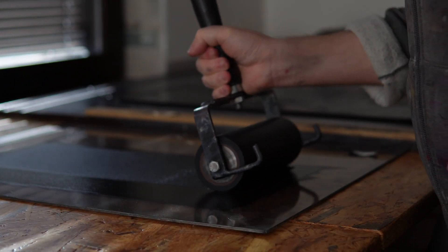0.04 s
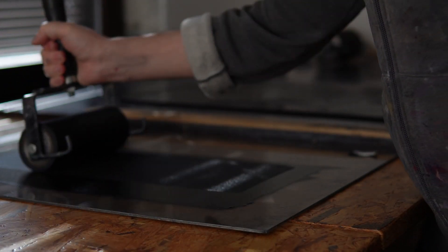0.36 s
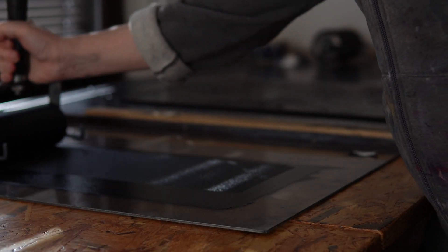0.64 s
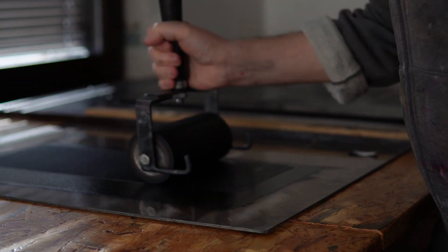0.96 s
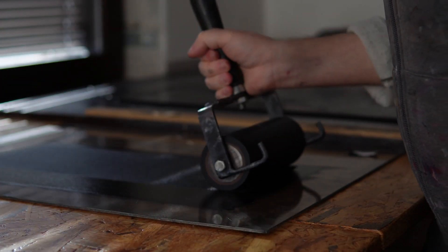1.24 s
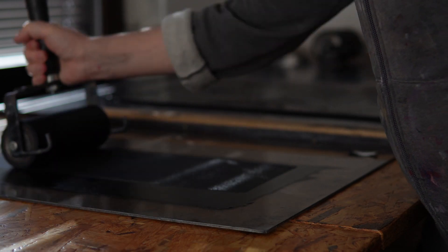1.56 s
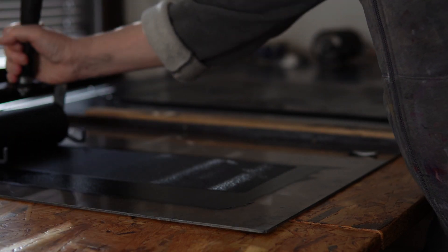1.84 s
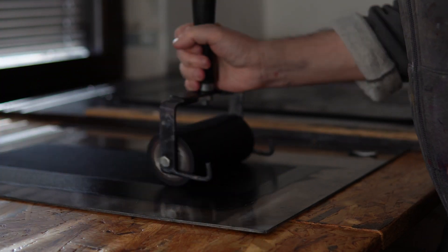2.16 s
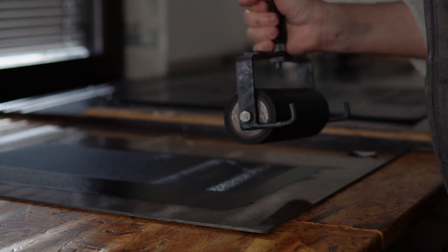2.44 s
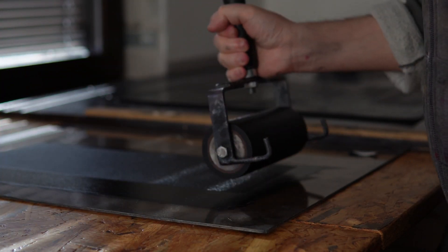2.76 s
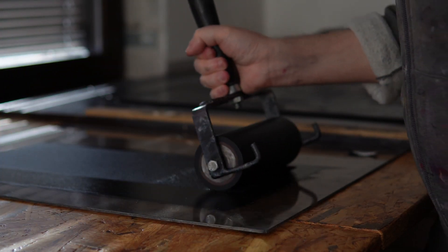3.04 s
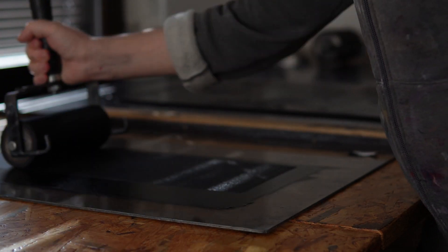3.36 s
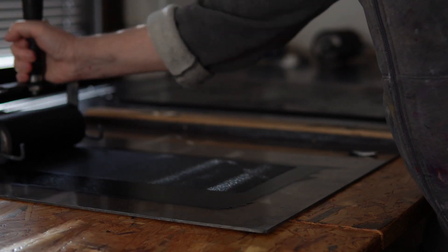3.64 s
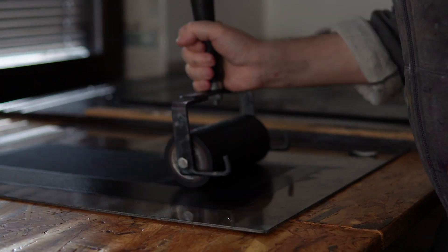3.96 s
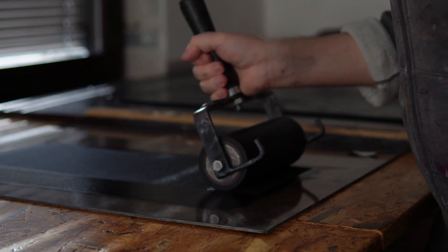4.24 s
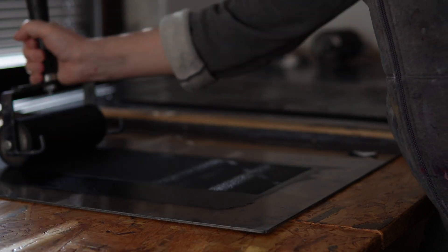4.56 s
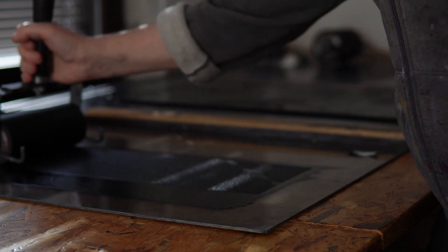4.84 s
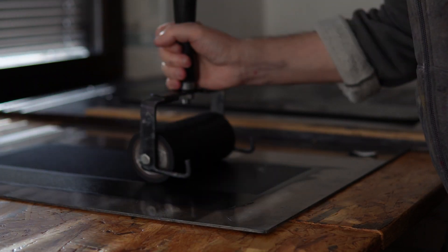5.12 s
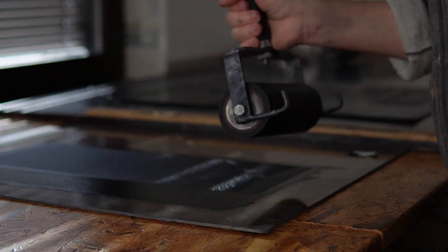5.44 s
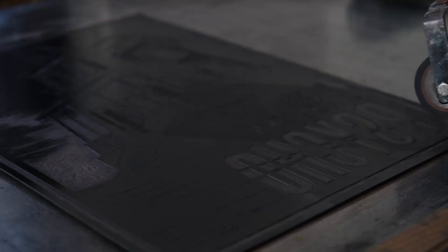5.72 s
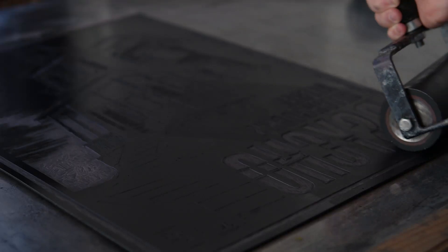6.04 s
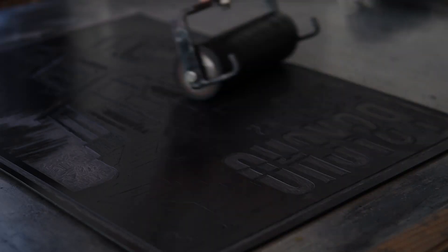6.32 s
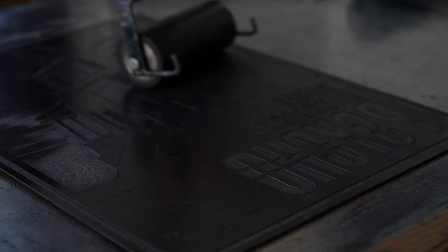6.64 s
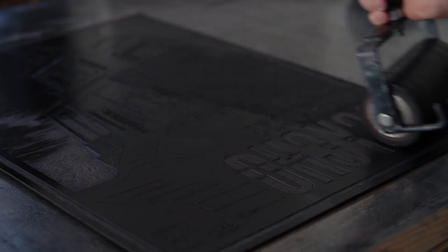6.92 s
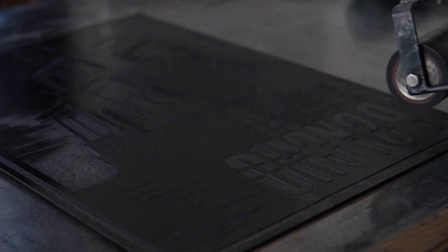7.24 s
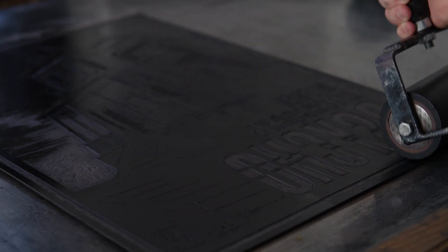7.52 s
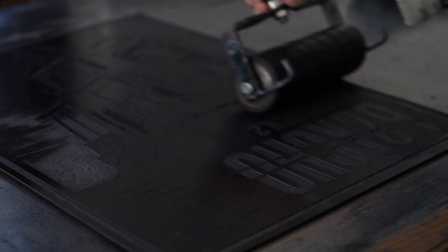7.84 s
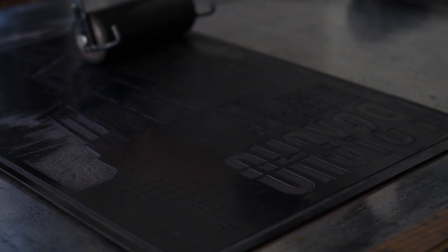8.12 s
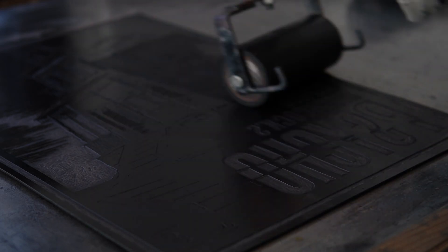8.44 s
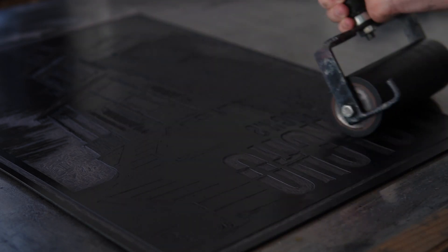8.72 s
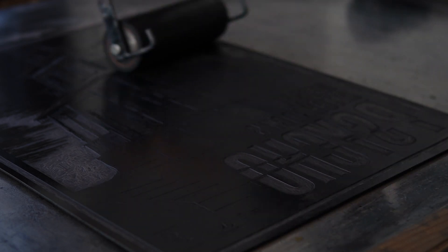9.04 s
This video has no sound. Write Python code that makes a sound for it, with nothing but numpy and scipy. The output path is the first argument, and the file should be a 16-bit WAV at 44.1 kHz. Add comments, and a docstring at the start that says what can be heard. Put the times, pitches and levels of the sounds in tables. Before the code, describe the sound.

A rubber hand roller moves back and forth through tacky ink on a slab, each stroke a dense, sticky sizzle over a low bench rumble. Its dry axle squeaks on the push and whistles on the pull, and the metal frame clanks when it lands. It then rolls over a printing block, with fainter sizzle and heavier rumble. The sound is close and in stereo, in a small, quiet workshop.

```python
"""A small quiet workshop, a stereo pair close to the bench. A rubber hand roller is worked through
tacky ink on a slab, lifted, set down, then rolled over a relief block. Ink threads snap in a dense
sizzle while the rubber crackles and rumbles on the bench. The dry axle sticks and slips, squeaking on
the push and whistling on the pull, and the steel frame clanks at each landing.
Short echoes and faint room tone lie behind."""
import sys
import numpy as np
from scipy import signal
from scipy.fft import next_fast_len
from scipy.io import wavfile

SR = 44100
rng = np.random.default_rng(int(sys.argv[2]) if len(sys.argv) > 2 else 0)


def wav_record(signal):
    """Record a signal, one row per channel, as 16-bit PCM in the file named by sys.argv[1]."""
    frames = np.transpose(np.atleast_2d(signal))
    bounded = np.clip(frames, -1, 1)
    # unit amplitude maps onto the largest positive 16-bit level
    quanta = np.round(bounded * 32767).astype(np.int16)
    wavfile.write(sys.argv[1], SR, quanta)


N = 404838
T = np.arange(N) / SR

# spectrum of ink threads snapping, on the slab and singly: f/Hz, level/dB
INK_SPECTRUM = [(500, -29), (1200, -16), (2200, -11), (3500, -7.5), (5000, -3.5), (7000, 1), (9000, 2),
                (13000, 3.5), (16000, -1.5)]


def amp(db):
    """Decibels to gain."""
    return 10 ** (np.asarray(db) / 20)


def unit(x):
    """Scale to rms 1."""
    return x / np.sqrt(np.mean(x ** 2))


def colour(x, points):
    """Filter a sound by a curve of (f/Hz, level/dB) points, to rms 1."""
    hz, db = np.transpose(points)
    f = np.maximum(np.fft.rfftfreq(x.shape[-1], 1 / SR), 1)
    gain = amp(np.interp(np.log(f), np.log(hz), db))
    return unit(np.fft.irfft(np.fft.rfft(x) * gain, x.shape[-1]))


def walk(t, rate):
    """Random wander with spread near 1 and `rate` turns a second."""
    knots = rng.standard_normal(4096)
    return 1.2 * np.interp((t * rate) % 4095, np.arange(4096), knots)


def add(out, start, x):
    """Mix a sound in at its time."""
    i = max(int(start * SR), 0)
    out[i:i + len(x)] += x[:max(N - i, 0)]


def spread(make, side_db):
    """A wide source: the same process feeds the middle and, more weakly, the sides."""
    return make() + amp(side_db) * make() * np.array([[1], [-1]])


def resonate(x, hz, width_hz, db):
    """What one resonance adds to a sound."""
    return amp(db) * signal.lfilter(*signal.iirpeak(hz, hz / width_hz, SR), x)


def bench(x):
    """The wooden top booms at its lowest modes."""
    # modes of the bench top: f/Hz, width/Hz, level/dB
    bench_modes = [(126.4, 11, 8.5), (176.5, 17, 7.5), (223, 9.1, -2), (306, 2.8, 6.5), (449.4, 10, 3)]
    return unit(x + sum(resonate(x, *mode) for mode in bench_modes))


def knocks(thud_rise_s=0.0042, thud_decay_s=0.037, clank_rise_s=0.00033):
    """Each contact is a brief chatter of loose parts that rings the steel frame, and a bench thud."""
    # landings, lift-offs and bumps over the relief: t/s, clank/dB, clank decay/s, thud/dB, thud f/Hz
    contacts = [(.002, -39, 0.041, -30.5, 177), (2.28, -34.5, 0.074, -45, 300),
                (2.501, -46.5, 0.02, -58, 287.5), (2.957, -28.5, 0.011, -25.5, 185),
                (2.971, -26.5, .017, -22.5, 185), (5.31, -40.5, .06, -35.5, 250),
                (5.596, -43, 0.033, -51, 305), (5.745, -46.5, 0.07, -66.5, 300),
                (6.009, -49, 0.01, -26.5, 90), (6.024, -25.5, 0.0099, -25, 198),
                (6.514, -50, .01, -36, 205), (6.939, -40, 0.011, -31, 138), (7.03, -31.5, 0.016, -52, 201),
                (7.111, -30, .016, -60, 200), (7.143, -41, 0.051, -53, 200), (7.609, -27, 0.0092, -34, 76),
                (7.86, -52, .01, -35, 175)]
    # spectrum of the loose parts: f/Hz, level/dB
    clank_spectrum = [(150, -2), (500, -1.5), (1300, 7), (2500, 2.5), (5000, 1), (8000, 1), (12000, -12.5),
                      (16000, -9)]
    # modes of the steel frame: f/Hz, width/Hz, level/dB
    frame_modes = [(1620, 8.6, 3.5), (2418, 49, 7), (2894, 150, 5.5), (3140, 40, -7), (3735, 17, 13),
                   (5070, 30, 8.5), (6450, 48, 8), (8540, 34, 11.5), (9450, 40, 11), (11440, 30, 18.5)]
    clatter, thuds, t = np.zeros(N), np.zeros(N), T[:SR // 2]
    for start, clank_db, decay, thud_db, thud_hz in contacts:
        contact = np.exp(-t / decay) * (1 - np.exp(-t / clank_rise_s)) * amp(2.6 * walk(t, 300))
        clank = colour(rng.standard_normal(len(t)), clank_spectrum)
        add(clatter, start, amp(clank_db) * contact * clank)
        band = signal.butter(3, [thud_hz / 2, thud_hz * 1.82], "band", fs=SR, output="sos")
        boom = bench(signal.sosfilt(band, rng.standard_normal(len(t))))
        envelope = np.exp(-t / thud_decay_s) * (1 - np.exp(-t / thud_rise_s))
        add(thuds, start, amp(thud_db) * boom * envelope)
    return clatter + sum(resonate(clatter, *mode) for mode in frame_modes) + thuds


def snaps(rate, spread_db):
    """Tiny ruptures of unequal size, `rate` a second."""
    chance, size = rng.random(N), rng.standard_normal(N)
    share = np.clip(rate / SR, 1e-4, 1)
    return (chance < share) * rng.choice([-1, 1], N) * amp(spread_db * size) / np.sqrt(share)


def ink(strokes, spectrum, spread_db, patchy_db, side_db, thin_hz):
    """Ink threads snap behind the roller in patches of tack; near each turn, few, faint and thin."""
    speed, gain = np.zeros(N), np.zeros(N)
    for start, _, end, _, _, db, rise, fall in strokes:
        build_up = 1 - np.exp(-np.maximum(T - start, 0) / rise)
        stroke = build_up * np.tanh(np.maximum(end - T, 0) / fall / 2) ** 1.22
        speed += stroke
        gain += amp(db) * stroke
    snaps_per_s = 14000 * (.2 + speed)
    sizzle = spread(lambda: colour(snaps(snaps_per_s, spread_db), spectrum), side_db)
    body = signal.sosfilt(signal.butter(1, thin_hz, fs=SR, output="sos"), sizzle)
    return (sizzle - body * np.clip(1 - speed, 0, 1)) * gain * amp(patchy_db * walk(T, 60))


def rolling(strokes, rumble_power, crackle_power, rumble_turn_db, crackle_turn_db, settle_s, bumps_db):
    """The turning rubber shakes the bench and crackles over the surface, both growing with speed."""
    # spectrum of the bench rumble: f/Hz, level/dB
    rumble_spectrum = [(30, -36.5), (60, -14), (95, -5.5), (120, -3.5), (150, -5.5), (185, -4.5),
                       (300, 0.5), (450, -3.5), (700, -26.5), (1500, -44.5)]
    # spectrum of the crackling rubber: f/Hz, level/dB
    rubber_spectrum = [(200, -34.5), (450, -4.5), (650, -1.5), (1100, -5), (1700, -5), (2800, -9.5),
                       (6000, -20.5)]
    # hollow resonances under the rubber: f/Hz, width/Hz, level/dB
    hollow_modes = [(526, 21, 0.5), (740, 16, -10.5), (1018, 11, -11)]
    shake, press = np.zeros(N), np.zeros(N)
    for start, fastest, end, rumble_db, crackle_db, *_ in strokes:
        speed = np.sin(np.pi / 2 * np.interp(T, [start, fastest, end], [0, 1, 0]))
        # a little sound carries through the turns and settles after the last
        contact = np.exp(-np.maximum(T - end, 0) / settle_s) * np.clip((T - start) / settle_s + 1, 0, 1)
        rumble_drive = np.hypot(speed ** rumble_power, amp(rumble_turn_db) * contact)
        crackle_drive = np.hypot(speed ** crackle_power, amp(crackle_turn_db) * contact)
        shake = np.maximum(shake, amp(rumble_db) * rumble_drive)
        press = np.maximum(press, amp(crackle_db) * crackle_drive)
    rumble = spread(lambda: bench(colour(snaps(1500, 2.1), rumble_spectrum)), side_db=-17.5)
    crackle = spread(lambda: colour(snaps(1800, 2.1), rubber_spectrum), side_db=-18)
    crackle = unit(crackle + sum(resonate(crackle, *mode) for mode in hollow_modes))
    return amp(bumps_db * walk(T, 40)) * (rumble * shake + crackle * press)


def roller_on_slab():
    """Back and forth through tacky ink: a dense, even sizzle over a low rumble."""
    # strokes: start t/s, fastest t/s, end t/s, rumble/dB, crackle/dB, sizzle/dB, its rise/s, its fall/s
    strokes = [ (.04, .38, 0.69, -45, -46, -26, 0.082, 0.044),
               (.69, 1.03, 1.286, -45, -45.5, -27.5, 0.021, 0.038),
               (1.265, 1.53, 1.872, -45, -45.5, -26, 0.042, 0.046),
               (1.86, 2.23, 2.368, -43.5, -45, -27, 0.037, 0.017),
               (3.035, 3.3, 3.646, -45, -44, -26.5, 0.051, 0.032),
               (3.632, 3.93, 4.247, -44.5, -45.5, -27, 0.032, 0.044),
               (4.23, 4.56, 4.822, -44, -44.5, -25, 0.043, 0.042),
               (4.83, 5.28, 5.392, -44, -44.5, -27, 0.038, 0.026)]
    sizzle = ink(strokes, INK_SPECTRUM, spread_db=2.5, patchy_db=0.76, side_db=-7.5, thin_hz=5070)
    return sizzle + rolling(strokes, rumble_power=1, crackle_power=1.24, rumble_turn_db=-10,
                            crackle_turn_db=-15.5, settle_s=0.032, bumps_db=1.3)


def axle(rows, partials, swell_db, flutter_db, mellow_db, jitter, chatter_hz, chatter_depth,
         flicker_db, scrape_db, edge_s):
    """Stick-slip tones glide and mellow as the axle frees itself; chatter adds sidebands and grit."""
    # spectrum of the axle scraping in its hole: f/Hz, level/dB
    scrape_spectrum = [(700, -31.5), (1250, -2.5), (1800, 3.5), (2600, 2.5), (3800, 5.5), (5000, -3),
                       (8000, -10), (13000, 6), (16000, 5)]
    out, grit = np.zeros(N), colour(rng.standard_normal(N), scrape_spectrum)
    for start, loudest, end, pitch_hz, glide, db, overtone_db, chatter in rows:
        t = np.arange(int(max(end - start, .01) * SR)) / SR
        along = np.linspace(-.5, .5, len(t))
        bounce = np.sin(2 * np.pi * np.cumsum(chatter_hz * (1 + 0.19 * walk(t, 150))) / SR)
        hz = pitch_hz * (1 + glide * along) * (1 + jitter * (0.39 + chatter) * walk(t, 400))
        phase = 2 * np.pi * np.cumsum(hz) / SR + chatter_depth * chatter * bounce
        bright_db = overtone_db - mellow_db * along
        tone = sum(amp(partial_db + bright_db * (k > 1) + flicker_db * walk(t, 132)) * np.sin(k * phase)
                   for k, partial_db in partials)
        scrape = amp(scrape_db) * chatter * grit[int(start * SR):][:len(t)]
        grip = np.sin(np.pi / 2 * np.clip(np.minimum(t, t[-1] - t) / edge_s, 0, 1))
        off_peak = np.interp(start + t, [start, loudest, end], [1, 0, 1])
        swell = amp(db - swell_db * off_peak + flutter_db * walk(t, 70))
        tremor = 1 + 0.58 * chatter * bounce
        add(out, start, swell * grip * (np.sqrt(2) * tone + scrape) * tremor)
    return out


def squeaks():
    """Pushing makes the axle squeak through resonances of the fork."""
    # squeaks: start t/s, loudest t/s, end t/s, f/Hz, glide/share of f, level/dB, overtones/dB, chatter
    slips = [ (.125, .225, 0.29, 1945, 0.035, -26.5, -11, 0.09),
             (.19, .205, .23, 1242, 0.014, -37.5, -4, 0.9),
             (1.205, 1.235, 1.287, 1927, 0.034, -33.5, -3, 0.46),
             (1.35, 1.385, 1.458, 1922, 0.036, -27.5, -5, 0.44),
             (1.365, 1.385, 1.42, 1263, .01, -37, -8, 0.9),
             (3.092, 3.18, 3.33, 1886, 0.036, -30.5, -2, 0.62),
             (3.905, 3.925, 4.05, 1197, 0.012, -41, 2, 0.92),
             (4.265, 4.335, 4.426, 1878, .01, -24.5, -6, .33),
             (6.169, 6.187, 6.252, 1940, 0.01, -25.5, -10, 0.6),
             (7.752, 7.762, 7.778, 1926, 0.0054, -25.5, 1, .4),
             (7.782, 7.827, 7.842, 1950, .075, -25.5, -11.5, 0.28),
             (8.179, 8.194, 8.213, 1630, 0.06, -18, -9.5, 0),
             (8.664, 8.697, 8.726, 1802, -0.022, -22.5, -5.5, 0.51),
             (8.778, 8.825, 8.87, 1941, 0.019, -23, -8.5, 0.46)]
    # harmonics of a squeak: multiple, level/dB
    partials = [(1, -3), (2, -3.5), (3, -1), (4, 1.5), (5, -4), (6, -6), (7, -4), (8, -16.5)]
    fork_modes = [(7350, 50, 10), (9340, 20, 22), (1550, 69, -2.5)]  # f/Hz, width/Hz, level/dB
    push = axle(slips, partials, swell_db=6, flutter_db=2, mellow_db=5, jitter=0.017,
                chatter_hz=247.7, chatter_depth=0.14, flicker_db=4, scrape_db=2.5, edge_s=0.01)
    return push + sum(resonate(push, *mode) for mode in fork_modes)


def squeals(mode_hz=11370, waver=0.0048, gap_s=0.02):
    """The bearing catches for an instant, slips, catches again, and rings one very high mode."""
    # double catches: t/s, half length/s, level/dB, second catch relative to the first/dB
    catches = [(0.393, 0.0072, -12.5, 1.5), (0.483, 0.013, -18.5, -15), (1.571, 0.0044, -15, -11),
               (2.87, 0.014, -25, -4), (2.934, 0.023, -20.5, -19), (3.424, 0.011, -20, -17),
               (4.561, 0.0078, -17, 3), (6.429, 0.0063, -22, 11), (8.111, .013, -20.5, -22),
               (8.435, .005, -28.5, -18), (8.504, 0.0066, -20.5, -7), (9.075, 0.0077, -9.5, -11)]
    out = np.zeros(N)
    for centre, half, db, second_db in catches:
        t = np.arange(-3 * half, gap_s + 3 * half, 1 / SR)
        envelope = np.exp(-(t / half) ** 2) + amp(second_db) * np.exp(-((t - gap_s) / half) ** 2)
        phase = 2 * np.pi * np.cumsum(mode_hz * (1 + waver * walk(t - t[0], 300))) / SR
        add(out, centre + t[0], amp(db) * envelope * np.sqrt(2) * np.sin(phase))
    return out


def whistles():
    """Pulling makes the axle whistle, higher and purer than it squeaks."""
    # whistles: start t/s, loudest t/s, end t/s, f/Hz, glide/share of f, level/dB, overtones/dB, chatter
    slips = [ (.58, .6, 0.64, 3520, 0.01, -41, -8, .7), (.87, .955, 1.022, 3550, 0.016, -30, -4, 0.33),
             (1.735, 1.77, 1.86, 3540, 0.0084, -32.5, -14, 0),
             (2.124, 2.15, 2.222, 3540, .012, -26, -2, 0.28),
             (2.322, 2.36, 2.412, 2980, .045, -34, -14, .5),
             (2.338, 2.35, 2.363, 5075, .012, -36, -17, .25),
             (3.505, 3.53, 3.56, 3540, 0.036, -36, -15, 0.4),
             (3.795, 3.87, 3.97, 3535, 0.018, -23.5, -4.5, 0.28),
             (3.912, 3.93, 4.07, 5070, -0.023, -34.5, -19, 0.15),
             (4.69, 4.72, 4.75, 3560, 0.047, -42, -12, 0.5),
             (5.013, 5.16, 5.245, 3525, -0.0042, -27, -5.5, 0.39),
             (5.148, 5.17, 5.19, 3510, 0.016, -24, -3, 0),
             (5.32, 5.33, 5.352, 2900, -0.0073, -29.5, -17, 0.5),
             (5.365, 5.41, 5.48, 3040, -.006, -41, -15, 0.34),
             (6.503, 6.512, 6.55, 3460, -.008, -33, 8.5, 0.26),
             (6.63, 6.642, 6.688, 3458, .016, -26.5, -2.5, .35)]
    # harmonics of a whistle: multiple, level/dB
    partials = [(1, 0), (2, -1), (3, -46.5)]
    return axle(slips, partials, swell_db=8, flutter_db=1.5, mellow_db=4.5, jitter=0.014,
                chatter_hz=284, chatter_depth=0.65, flicker_db=2.5, scrape_db=-17.5, edge_s=0.009)


def roller_on_block():
    """Over the relief the ink snaps more faintly and unevenly, and the rubber rumbles harder."""
    # strokes: start t/s, fastest t/s, end t/s, rumble/dB, crackle/dB, sizzle/dB, its rise/s, its fall/s
    strokes = [ (6.08, 6.51, 6.79, -40, -37, -39, 0.088, 0.078),
               (6.6, 6.76, 7.085, -39, -38.5, -39, 0.084, .036),
               (7.63, 8.02, 8.29, -40.5, -38.5, -35.5, 0.15, 0.093),
               (8.24, 8.45, 8.8, -39.5, -40, -39.5, 0.039, 0.077),
               (8.7, 9.06, 9.41, -42, -37.5, -35.5, 0.061, 0.18)]
    # spectrum of ink snapping on the block: f/Hz, level/dB
    spectrum = [(500, -30.5), (1200, -25), (2200, -11.5), (4000, -1), (7000, 5), (10000, 3), (13000, 4),
                (16000, -1)]
    sizzle = ink(strokes, spectrum, spread_db=5.5, patchy_db=1.6, side_db=-6, thin_hz=2000)
    return sizzle + rolling(strokes, rumble_power=2.4, crackle_power=2.74, rumble_turn_db=-11,
                            crackle_turn_db=-12.5, settle_s=0.066, bumps_db=2)


def threads(decay_s=0.0064):
    """Single long ink threads part with thin ticks."""
    # last threads as the roller leaves the block: t/s, level/dB
    ticks = [(7.072, -31), (7.093, -29), (7.124, -33), (7.145, -32), (7.155, -33), (7.206, -40),
             (7.221, -42)]
    out, t = np.zeros(N), T[:SR // 20]
    for start, db in ticks:
        tick = colour(rng.standard_normal(len(t)), INK_SPECTRUM)
        add(out, start, amp(db) * np.exp(-t / decay_s) * tick)
    return out


def glance(x, db, above_hz):
    """The slab reflects the treble out of phase between the two microphones, which widens it."""
    bright = signal.sosfilt(signal.butter(2, above_hz, "high", fs=SR, output="sos"), x)
    turned = signal.hilbert(bright, next_fast_len(N))[:N].imag
    return x + amp(db) * turned * np.array([[1], [-1]])


def workshop(x, side_db, gap_s=0.0071, t60_s=0.43, treble_t60_s=0.21):
    """Diffuse echoes of bench and walls; the treble dies sooner."""
    t = T[:int(.8 * SR)]
    noise = spread(lambda: rng.standard_normal(len(t)), side_db)
    low = signal.sosfilt(signal.butter(1, 4000, fs=SR, output="sos"), noise)
    tail = low * amp(-60 * t / t60_s) + (noise - low) * amp(-60 * t / treble_t60_s)
    tail = unit(tail * (t > gap_s)) / np.sqrt(len(t))
    return signal.fftconvolve(x[None], tail, axes=1)[:, :N]


def room_tone():
    """The air of the room, a faint, steady, low hush."""
    # spectrum of the air: f/Hz, level/dB
    spectrum = [(15, -29.5), (25, -3), (46, -6), (69, -13.5), (281, -16), (410, -14), (482, -16),
                (523, -18.5), (895, -25), (1170, -19), (1950, -28.5), (2420, -24.5), (3170, -30.5),
                (8350, -27.5), (15500, -34.5)]
    return amp(-60.5) * spread(lambda: colour(rng.standard_normal(N), spectrum), side_db=-5)


def scene():
    """Roller, axle and frame close to the microphones, the room behind them."""
    roller = roller_on_slab() + roller_on_block()
    metal = amp(-0.5) * squeaks() + whistles() + amp(-1) * squeals()
    hits = knocks() + threads()
    near = roller + glance(metal + hits, db=-11.5, above_hz=2260)
    echoes = workshop(amp(-7) * metal + amp(-6) * hits + amp(-9.5) * roller.mean(axis=0), side_db=-5)
    return near + echoes + room_tone()


def record(dry, top_hz=16050):
    """The recorder cuts the top steeply."""
    return signal.sosfilt(signal.ellip(12, .1, 80, top_hz, fs=SR, output="sos"), dry)


dry = scene()
out = record(dry)
wav_record(out)
```